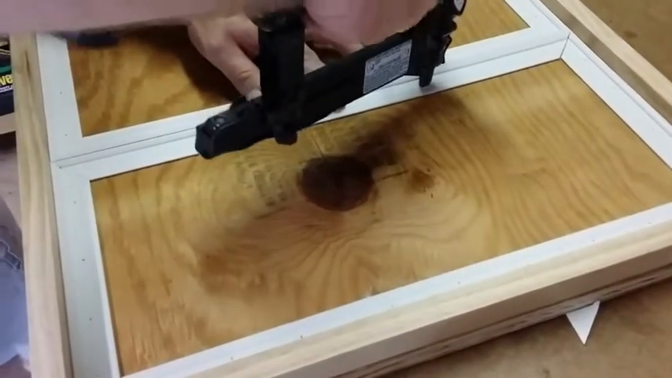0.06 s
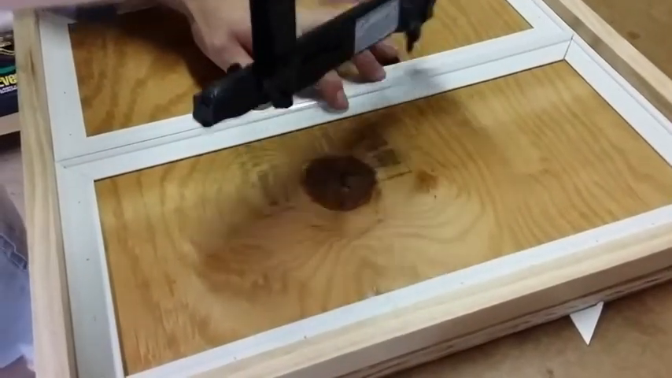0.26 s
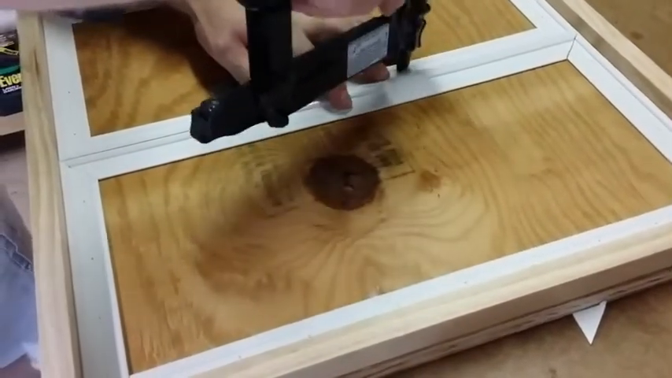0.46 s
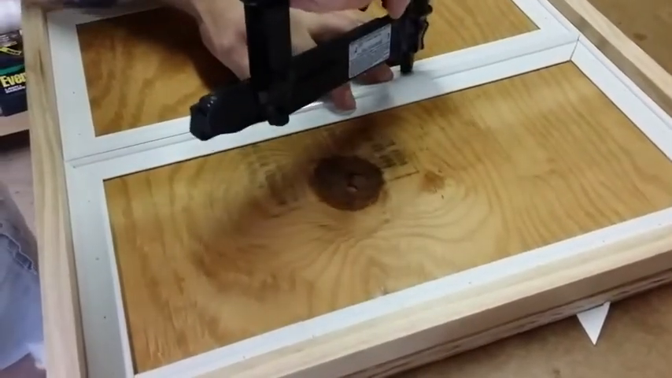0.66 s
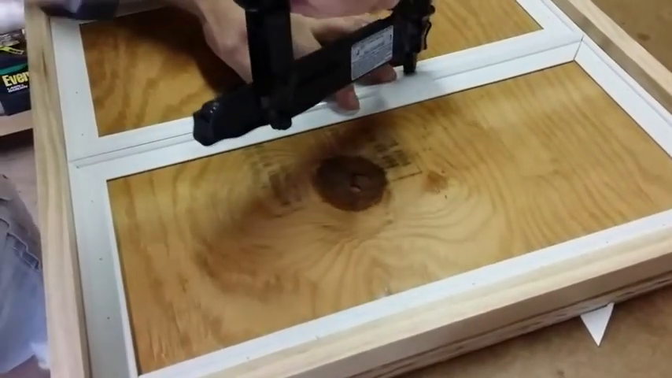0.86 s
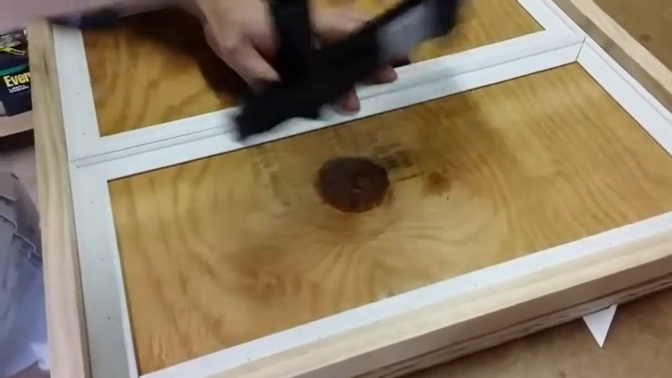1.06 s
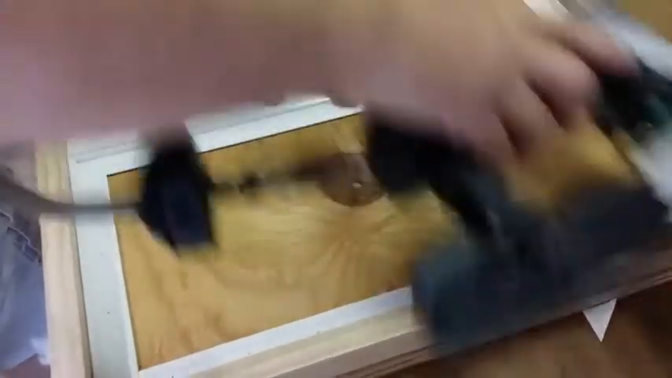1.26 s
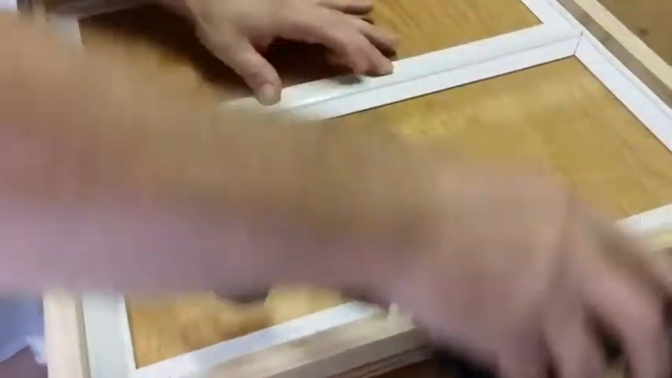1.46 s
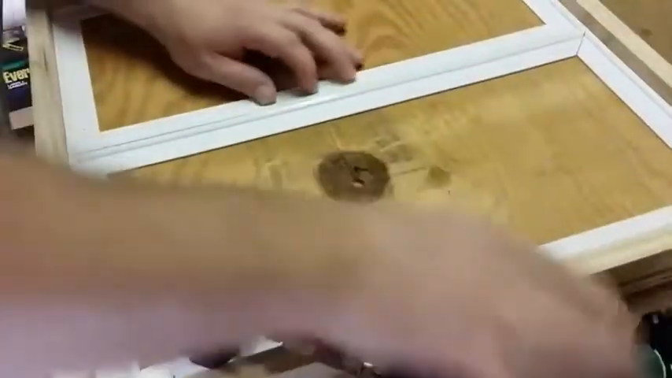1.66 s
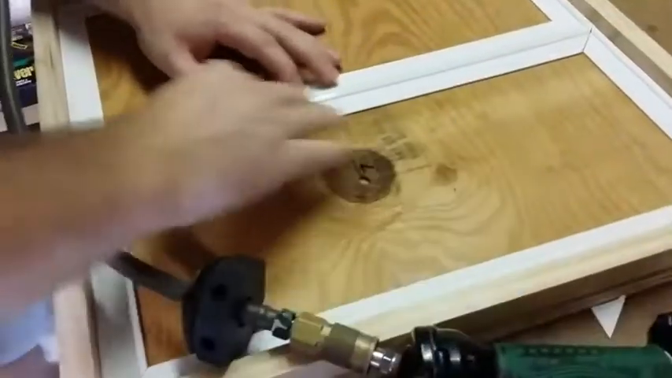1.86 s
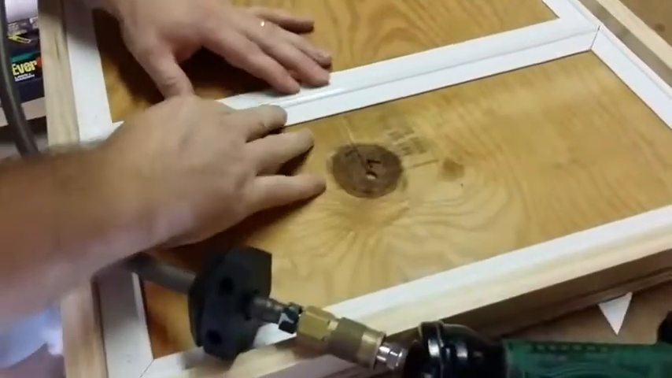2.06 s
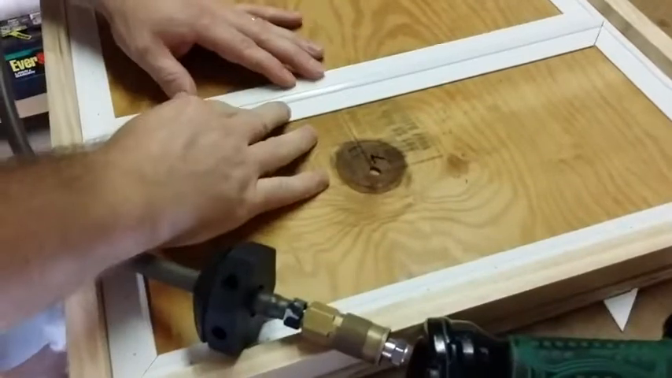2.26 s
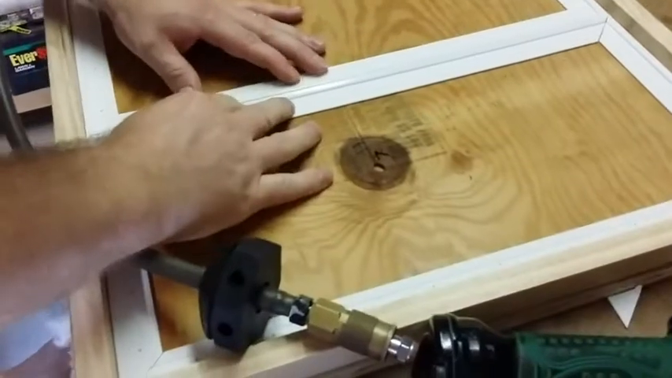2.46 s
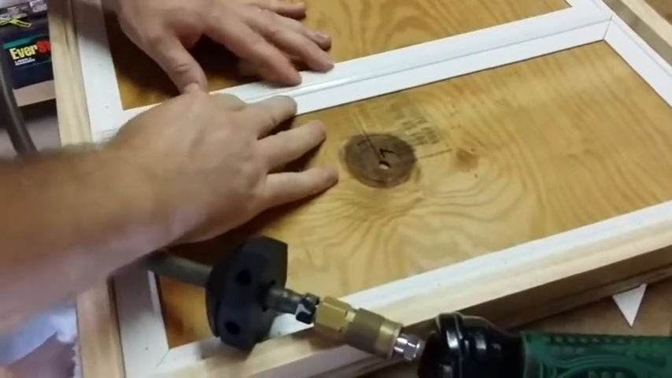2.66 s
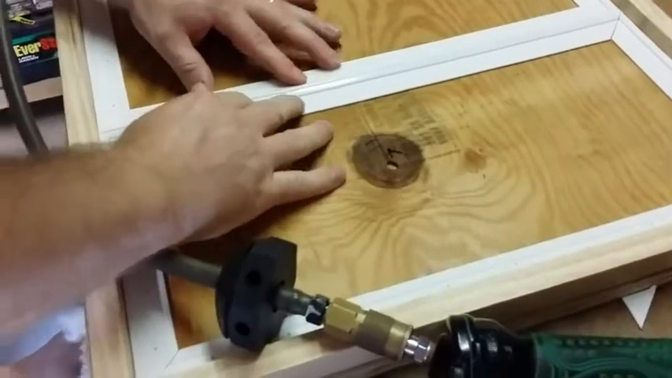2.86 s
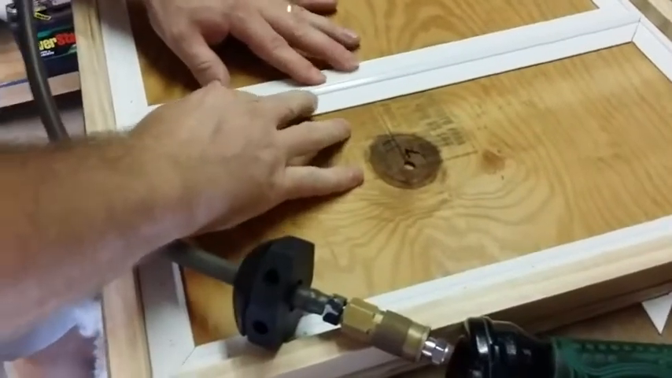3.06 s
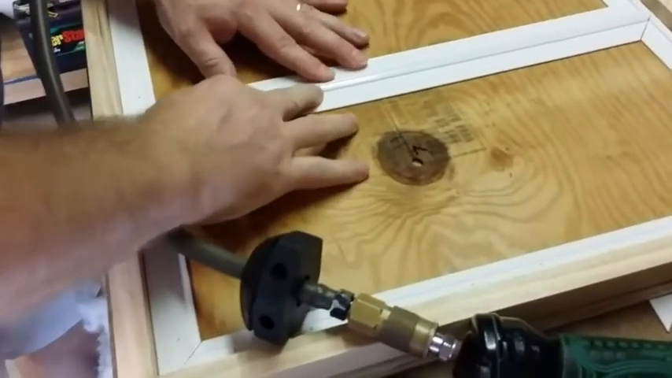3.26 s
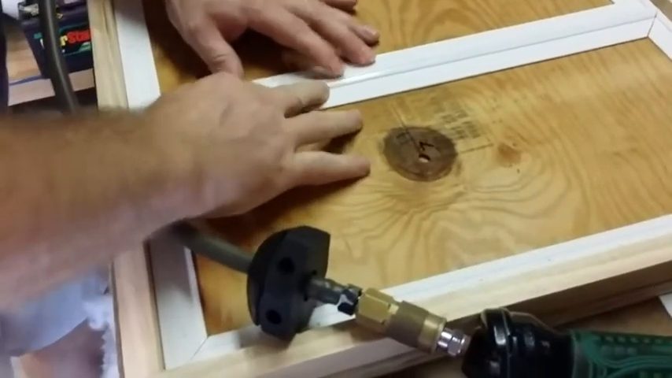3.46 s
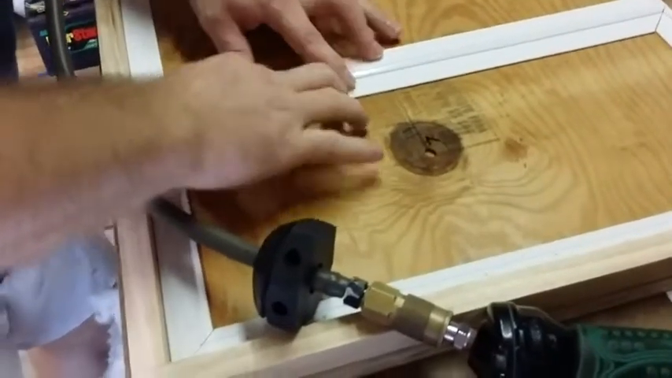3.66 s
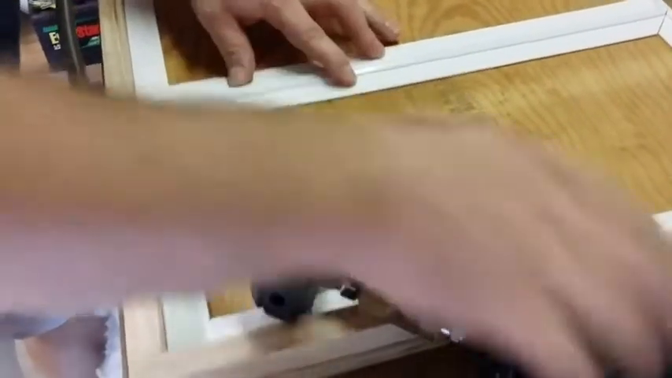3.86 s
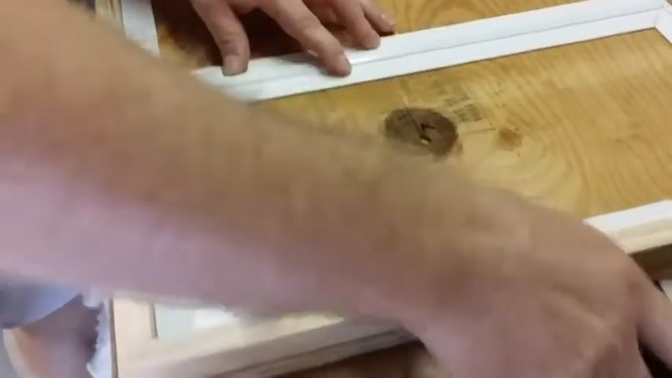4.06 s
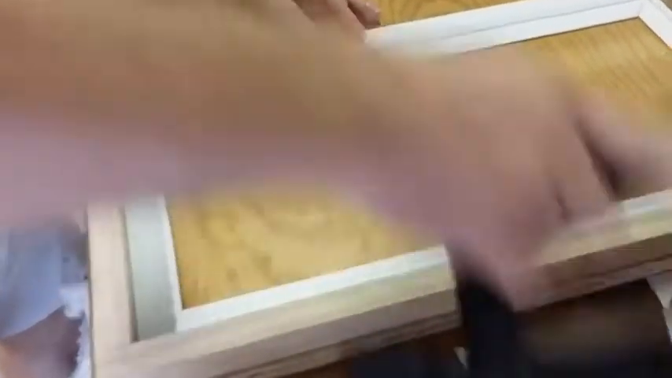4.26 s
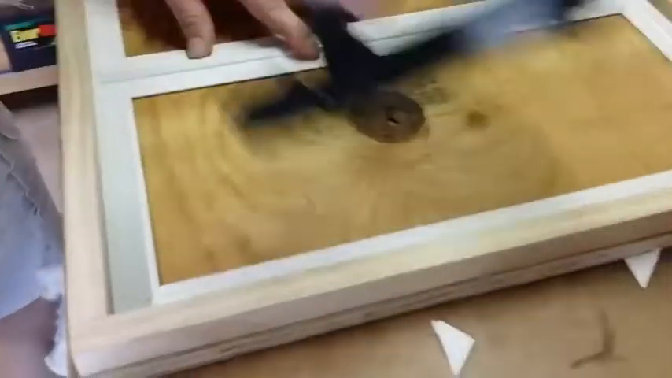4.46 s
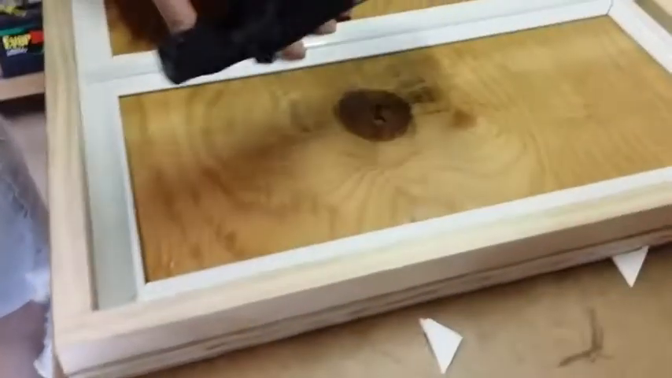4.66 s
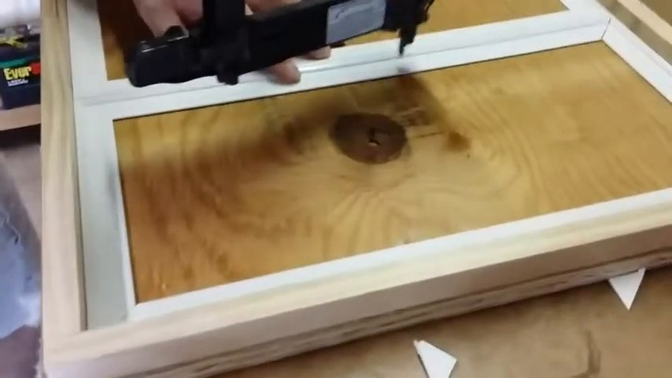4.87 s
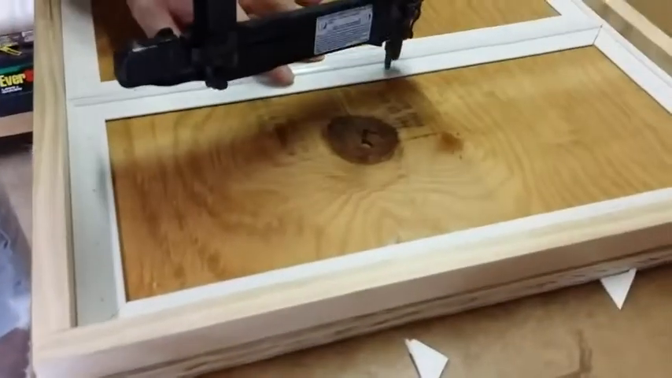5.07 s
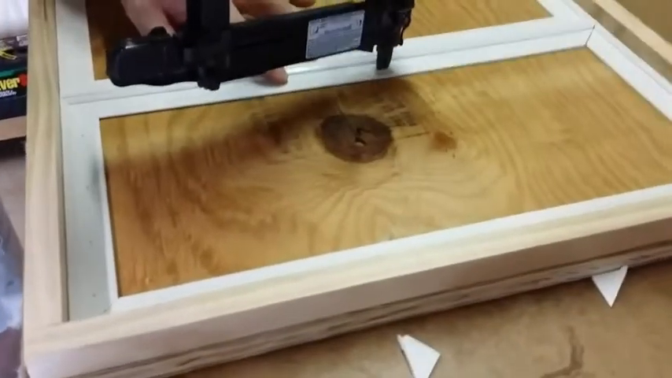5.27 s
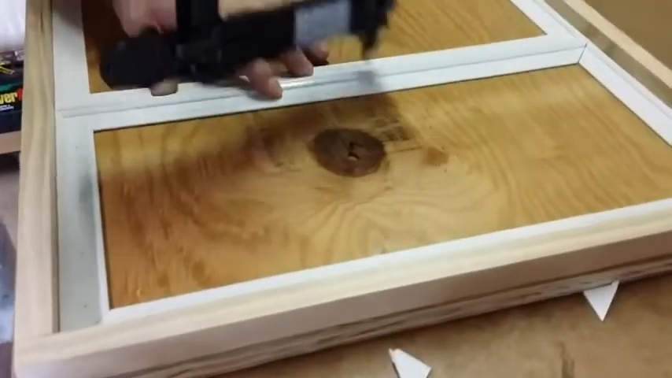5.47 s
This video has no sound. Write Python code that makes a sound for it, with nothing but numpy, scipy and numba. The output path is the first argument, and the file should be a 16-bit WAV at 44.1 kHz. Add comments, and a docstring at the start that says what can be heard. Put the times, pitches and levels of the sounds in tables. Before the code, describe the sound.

Stereo phone recording near a workbench: violent dry staple shots with woody thuds and short bright bursts of escaping air, two early and one at the very end. Between them come a hard tool knock, trailing taps and faint metal clicks. A compressor drones and clatters throughout, pushed down after each loud hit and returning to full level in the middle. Short indoor echo.

```python
"""Air stapler in a workshop

An air stapler fires into a wooden frame twice, venting each time, is laid down and picked up,
then fires and vents once more. Noise bursts make the bangs, air and clicks; fading sine waves ring the wood.
A piston compressor runs all along, built from sine waves at multiples of its stroke rate, hiss and valve rings.
A phone's gain control turns everything down after very loud sounds and lets the level back up."""
import sys
import numpy as np
from scipy import signal
from scipy.fft import rfft, irfft
from scipy.io import wavfile
from numba import njit

SR = 44100
rng = np.random.default_rng(int(sys.argv[2]) if len(sys.argv) > 2 else 0)


def generate_wav(signal):
    """Clip the signal to [-1, 1] and save it as 16-bit WAV at the path in sys.argv[1]."""
    frames = np.transpose(np.atleast_2d(signal))
    scaled = np.clip(frames, -1, 1) * 32767
    pcm = np.round(scaled).astype(np.int16)
    wavfile.write(sys.argv[1], SR, pcm)


N = 242550
T = np.arange(N) / SR


def stapler():
    """All the sounds of the tool and the wood, before the walls answer."""
    out = np.zeros((2, N))
    shots(out)
    vents(out)
    knocks(out)
    clicks(out)
    return out


def shots(out):
    """The driver hits staple and bumper, then the steel parts shake and die away."""
    # Each row: start in seconds, bang level in dB, wood level in dB, left minus right in dB.
    shot_rows = [(0.0709, 6, 8.5, 1), (0.8804, 6.5, 8.5, 0), (5.299, 9.5, 13, 0.5)]
    # Colour of the bang. Each row: frequency in Hz, relative level in dB per Hz.
    bang_colour = [(50, -30), (110, -14.5), (340, -2.5), (760, -3.5), (1300, 0.5), (1800, -1.5), (2420, 2),
                   (3060, -1), (3500, -7.5), (6600, -7.5), (15600, -15.5)]
    for start_s, bang_db, wood_db, pan_db in shot_rows:
        crack = .8 * burst(.0002, .001, .012)
        short_shake = burst(0.0025, 0.011, 0.095)
        long_shake = undb(-7.5) * burst(0.00039, 0.045, 0.26)
        bang = colour(grit(1.8) * (crack + short_shake + long_shake), bang_colour)
        wood = panel(0.59, 1.0)
        add(out, start_s, undb(bang_db) * bang + undb(wood_db) * wood, pan_db)


def vents(out):
    """The trigger is let go: the piston slams back, the wood is knocked and air rushes out."""
    # Each row: start in seconds, slam level in dB, wood level in dB, air level in dB, left minus right in dB.
    vent_rows = [(0.1472, -3, -5, 6.5, -0.5), (0.9775, -1, 1.5, 6, -0.5), (5.385, -2.5, 4.5, 7.5, -1.5)]
    # Colours of slam and air. Each row: frequency in Hz, relative level in dB per Hz.
    slam_colour = [(150, -1), (400, -2), (900, -0.5), (1800, -6), (3000, -6.5), (4500, -19.5), (15600, -32)]
    air_colour = [(300, -9), (900, -34), (1800, -26), (2400, 1), (3100, 0), (3800, -3), (5000, 1),
                  (6700, 3.5), (10000, 4), (15600, 2.5)]
    for start_s, slam_db, wood_db, air_db, pan_db in vent_rows:
        hit = 2.2 * burst(.0004, .003, .012)
        slam = colour(grit(1.83) * (hit + burst(0.0018, 0.031, 0.019)), slam_colour)
        # the recoil knocks the wood, and the tool drops back on it 19 ms later
        recoil = panel(0.54, 0.78)
        drop = np.roll(panel(3.8, 0.69), int(0.019 * SR))
        wood = recoil + undb(-6.0) * drop
        air = colour(grit(0.44) * burst(0.0044, 0.018, 0.32), air_colour)
        add(out, start_s, undb(slam_db) * slam + undb(wood_db) * wood + undb(air_db) * air, pan_db)


def knocks(out):
    """The tool or a hand meets the wood; loose parts rattle, less so when the contact is longer."""
    # Each row: start in seconds, level in dB, contact time in ms, share of the wood's free ring time.
    knock_rows = [(.449, -26, 1.16, 0.56), (.459, -21, 3, .7), (0.6477, -17, 1.7, 0.66),
                  (.663, -24, 1.8, .6), (1.5815, 8.5, 0.69, 1.12), (1.606, -7.5, 1.8, 0.77),
                  (1.63, -14, 0.98, .8), (1.729, -12, 1.35, 1.1), (1.784, -26.5, 2, 0.82),
                  (1.902, -18.5, 1.9, 1), (1.995, -24, 2.5, 0.58), (5.152, -7.5, 2.25, 0.43),
                  (5.167, -20.5, 2.1, 0.65), (5.178, -18, 1.8, 0.52)]
    # Colour of the loose parts. Each row: frequency in Hz, relative level in dB per Hz.
    rattle_colour = [(180, -22), (300, -19), (1140, -6.5), (1440, -18), (1760, -10), (2070, -10.5),
                     (6070, -18), (15600, -27.5)]
    for start_s, db, contact_ms, ring_share in knock_rows:
        # -9.5 dB for a contact of 1 ms, 7.5 dB less for each doubling
        rattle_db = -9.5 - 7.5 * np.log2(contact_ms)
        rattle = colour(grit(0.57) * burst(0.00039, 0.008, 0.054), rattle_colour)
        wood = panel(contact_ms, ring_share)
        add(out, start_s, undb(db) * (wood + undb(rattle_db) * rattle), -.6)


def clicks(out):
    """Small metal parts of the tool click; higher clicks die away sooner."""
    # Each row: start in seconds, level in dB, lowest frequency in Hz, highest frequency in Hz,
    # left minus right in dB.
    click_rows = [(.0327, -20, 1980, 10600, -0.5), (.353, -19, 740, 1500, -2),
                  (.354, -17.5, 3500, 11970, -3), (1.426, -31, 2000, 8100, -3), (1.732, -26, 880, 1220, 5),
                  (1.901, -27, 875, 1150, -8), (4.142, -25, 4000, 8000, 3), (4.151, -26.5, 1600, 8100, -3),
                  (4.3827, -22, 1790, 11800, 2), (4.392, -36, 2480, 15000, -6),
                  (4.483, -32, 5000, 15000, 0), (4.954, -18, 1750, 6540, 3), (4.968, -20.5, 2000, 9400, 2),
                  (5.153, -32, 1500, 5000, -3), (5.2598, -23, 3200, 14700, 1)]
    for start_s, db, lo_hz, hi_hz, pan_db in click_rows:
        # 0.13 s to fall by 60 dB when the middle of the band is near 1.1 kHz
        t60_s = 0.13 * (1200000.0 / lo_hz / hi_hz) ** (0.65 / 2)
        tick = level(band(grit(3), lo_hz, hi_hz), 0) * burst(.0004, .001, t60_s)
        add(out, start_s, undb(db) * tick, pan_db)


def panel(contact_ms, ring_share):
    """Wood rings after a push; a longer push rings the high tones less, a resting hand damps them all."""
    # Tones of the panel on its bench, before random spread and damping.
    # Each row: frequency in Hz, relative level in dB, time to fall by 60 dB in seconds.
    modes = [(96, -10.5, 0.22), (134.3, -6, 0.17), (195.6, -5, 0.13), (254.7, -8.5, 0.18),
             (355, 8.5, 0.028), (449, -3, 0.039), (600, -5.5, 0.019), (714, -2, .07), (900, -19, 0.084),
             (1200, -15, .05), (1866, 18.5, 0.022), (345, 11.5, 0.027), (665, 7.5, 0.015)]
    t = T[:SR // 2]
    ring = np.zeros(len(t))
    for k, (hz, db, t60_s) in enumerate(modes):
        level_chance, pitch_chance = rng.standard_normal(2)
        fade = undb(db + 2 * level_chance - 60 * t / (t60_s * ring_share))
        tone = np.sin(2 * np.pi * hz * (1 + 0.044 * pitch_chance) * t)
        ring += (-1) ** k * fade * tone
    # the push is half a sine wave
    push = np.sin(np.pi * np.minimum(t[:SR // 100] * 1000 / contact_ms, 1))
    ring = signal.fftconvolve(ring, push)[:len(t)]
    return ring / np.abs(ring).max()


def compressor():
    """A piston machine repeats its thump and clatter each stroke; valve and fan hiss pulses with it."""
    # Colour of the thump. Each row: frequency in Hz, relative level in dB.
    thump_colour = [(60, -57), (120, -12), (240, -7), (390, -11), (440, -24), (560, -17.5), (660, -20.5),
                    (830, -16), (1050, -15)]
    # Partials that stand out. Each row: multiple of the stroke rate, relative level in dB.
    hum_rows = [(2, 0.5), (7, -3.5), (9, -0.5), (22, -12)]
    # Colours of clatter and hiss. Each row: frequency in Hz, relative level in dB per Hz.
    clatter_colour = [(650, -29), (1100, -8), (1230, 12.5), (2620, 12.5), (3600, -12), (4680, -32),
                      (7920, -120)]
    hiss_colour = [(30, -32), (66, -1.5), (108, -18), (270, -8), (456, -18.5), (750, -19.5), (1030, -13.5),
                   (1560, -16.5), (2700, -15.5), (3330, -18), (5200, -17), (6900, -14.5), (8600, -19.5),
                   (15600, -26.5)]
    stroke_hz, stroke_s = 29.886, 3.2105  # strokes per second, time of one stroke
    turn = 2 * np.pi * stroke_hz * (T - stroke_s)
    apart = np.array([[1], [-1]])

    def partial(k, db, scatter):
        """One sine wave at k times the stroke rate, a little earlier on the left."""
        random_phase = scatter * rng.uniform(-np.pi, np.pi)
        return -undb(db) * np.cos(k * (turn + 0.026 * apart) + random_phase)

    low = np.arange(3, 36)
    # partials above the 13th differ by chance from their neighbours
    low_db = shape(thump_colour, low * stroke_hz) + 3.5 * rng.standard_normal(len(low)) * (low > 13)
    # the motor whine has neighbours three multiples away, so it swells three times a turn
    whine = {31: -4, 34: -3.5, 37: -7.5}  # multiple of the stroke rate: relative dB
    # hum and whine take the place of the plain partials they share a multiple with
    lines = {**dict(zip(low, low_db)), **dict(hum_rows), **whine}
    thump = 0
    for k, db in lines.items():
        # higher partials get more random phase, so the thump is less sharp
        scatter = .2 if k in whine else min(k / 40, 1)
        thump = thump + partial(k, db, scatter)
    # strokes differ slightly in strength
    strokes = np.arange(-100, 100)
    stroke_chance = rng.standard_normal(len(strokes))
    thump = thump * undb(0.25 * np.interp(turn / (2 * np.pi), strokes, stroke_chance))

    high = np.arange(39, 120)
    high_db = shape(clatter_colour, high * stroke_hz) + 2.5 * rng.standard_normal(len(high))
    clatter = sum(partial(k, db, 1) for k, db in zip(high, high_db))
    hiss = colour(pair(N, apart_hz=201), hiss_colour) * undb(0.64 * np.cos(turn + 2.2))
    # a tone apart from the stroke rate, perhaps a fan
    fan = level(np.sin(2 * np.pi * 124.7 * T), -55)
    machine = level(thump, -31) + level(clatter, -39) + level(hiss, -33) + reeds(stroke_hz, stroke_s) + fan
    lean = undb(0.32 * apart / 2)  # slightly louder on the left
    return lean * machine


def reeds(stroke_hz, stroke_s):
    """Reed valves: one click a stroke, each a little different, rings the valve plates."""
    # Each row: frequency in Hz, level in dB, time to fall by 60 dB in seconds, delay after the thump in seconds.
    reed_rows = [(1480, -58, 0.12, 0.012), (1862, -46.5, 0.093, 0.002895), (2400, -57.5, 0.017, 0.0209),
                 (2701, -45, 0.06, 0.0058)]
    starts = stroke_s % (1 / stroke_hz) + np.arange(-1, N / SR * stroke_hz - 1) / stroke_hz
    out = np.zeros((2, N))
    t = T[:SR // 10]
    for hz, db, t60_s, delay_s in reed_rows:
        time_chance, strength_chance = rng.standard_normal((2, len(starts)))
        at = np.clip((starts + delay_s + .00004 * time_chance) * SR, 0, N - 1).astype(int)
        impulses = np.zeros(N)
        impulses[at] = undb(1.8 * strength_chance)
        # the two channels ring with different phase
        tone = np.sin(2 * np.pi * hz * t + np.array([[0], [1.4]]))
        ring = np.minimum(t / 0.00038, 1) * undb(-60 * t / t60_s) * tone
        out += level(signal.fftconvolve(impulses[None], ring, axes=1)[:, :N], db)
    return out


def shop(x):
    """The workshop answers with a blur of echoes, different at each microphone, growing over 16 ms."""
    # Each row: frequency in Hz, time to fall by 60 dB in seconds.
    echo_rows = [(150, 0.3), (500, 0.37), (1500, 0.19), (4000, 0.45), (10000, 0.33)]
    t = T[:SR // 2]
    tails = np.zeros((2, len(t)))
    for hz, t60_s in echo_rows:
        noise = rng.standard_normal((2, len(t)))
        tails += band(noise, hz / 2, hz * 2.37) * undb(-60 * t / t60_s)
    tails = tails * np.minimum(t / 0.016, 1)
    tails = tails / np.sqrt(np.sum(tails ** 2, axis=1, keepdims=True))
    echoes = signal.fftconvolve(x.mean(0, keepdims=True), tails)[:, :N]
    return x + undb(-8) * echoes


def grit(scatter_db, size=SR // 2):
    """Noise whose size jumps every millisecond, as in a run of small collisions."""
    jumps = np.repeat(rng.standard_normal(size // 44 + 1), 44)[:size]
    return level(pair(size) * undb(scatter_db * jumps), 0)


def pair(size, apart_hz=400):
    """Noise at two microphones: alike in the bass, more and more different towards the treble."""
    mid, side = rng.standard_normal((2, size))
    side = signal.sosfilt(signal.butter(1, apart_hz, "high", fs=SR, output="sos"), side)
    return mid + side * np.array([[1], [-1]])


def burst(rise_s, hold_s, t60_s, size=SR // 2):
    """Loudness curve: a rise, a plateau, then a fall by 60 dB in t60_s."""
    t = T[:size]
    rise = np.minimum(t / max(rise_s, 1 / SR), 1)
    return rise * undb(-60 * np.maximum(t - rise_s - hold_s, 0) / t60_s)


def undb(db):
    """Turn decibels into a plain factor."""
    return 10 ** (np.asarray(db) / 20)


def level(x, db):
    """Scale a sound to an average (RMS) level in dB."""
    return x * undb(db) / np.sqrt(np.mean(x ** 2))


def shape(table, hz):
    """Read a spectrum between its points, on a log-frequency axis."""
    at, value = np.transpose(table)
    return np.interp(np.log(np.maximum(hz, 1)), np.log(at), value)


def colour(x, table, size=4096):
    """Filter that gives noise the spectrum of a table, with no sound ahead of time; white noise keeps its power."""
    bins_hz = np.arange(size // 2 + 1) * SR / size
    # folding the cepstrum puts the filter's energy as early as possible (minimum phase)
    ceps = irfft(np.log(undb(shape(table, bins_hz))))
    ceps[1:size // 2] *= 2
    taps = irfft(np.exp(rfft(ceps[:size // 2], size)))[:size // 2]
    taps = taps / np.sqrt(np.sum(taps ** 2))
    x = np.atleast_2d(x)
    return signal.fftconvolve(x, taps[None], axes=1)[:, :x.shape[1]]


def band(x, lo_hz, hi_hz):
    """Keep mainly the sound between two frequencies."""
    edges = [lo_hz, min(hi_hz, SR * .45)]
    return signal.sosfilt(signal.butter(2, edges, "band", fs=SR, output="sos"), x)


def add(out, start_s, x, pan_db):
    """Place a sound in the stereo pair; pan_db is left minus right."""
    i = int(start_s * SR)
    sides = undb(np.array([[pan_db], [-pan_db]]) / 2)
    out[:, i:i + x.shape[-1]] += x[..., :N - i] * sides


def scene():
    """The stapler with its echoes, and the compressor behind it."""
    return shop(stapler()) + compressor()


@njit
def duck(peak, trip, duck_db, hold, attack, release):
    """Gain in dB: drops fast when the sound passes the trip level, holds, then eases back; starts ducked."""
    out = np.empty(len(peak))
    wait, first, second = hold, duck_db, duck_db
    for i in range(len(peak)):
        wait = hold if peak[i] > trip else wait - 1
        goal, rate = (duck_db, attack) if wait > 0 else (0., release)
        # two smoothing steps in a row
        first += (goal - first) * rate
        second += (first - second) * rate
        out[i] = second
    return out


def record(dry):
    """Unequal microphone ports, bass cut, gain control, clipping of what is still too loud, and a treble cut."""
    # Uneven ports. Each row: frequency in Hz, left minus right in dB before each side keeps its noise power.
    port_rows = [(60, 1.0), (4400, 1.5), (8120, 0.0), (15000, -0.5)]
    ports = np.array(port_rows)
    # each side takes half of the difference
    left = colour(dry[0], ports * [1, .5])
    right = colour(dry[1], ports * [1, -.5])
    dry = np.vstack([left, right])
    dry = signal.sosfilt(signal.butter(2, 48, "high", fs=SR, output="sos"), dry)
    trip, duck_db = .8, -18.0  # peak that sets off the gain control, its gain in dB
    hold_s, attack_s, release_s = 0.75, 0.0047, 0.13  # attack and release: of each smoothing step
    peak = np.abs(dry).max(0)
    gain_db = duck(peak, trip, duck_db, hold_s * SR, 1 / (attack_s * SR), 1 / (release_s * SR))
    loud = np.clip(dry * undb(gain_db), -.85, .85)
    top_hz = 15735
    return signal.sosfilt(signal.ellip(10, .2, 60, top_hz, fs=SR, output="sos"), loud)


dry = scene()
out = record(dry)
generate_wav(out)
```